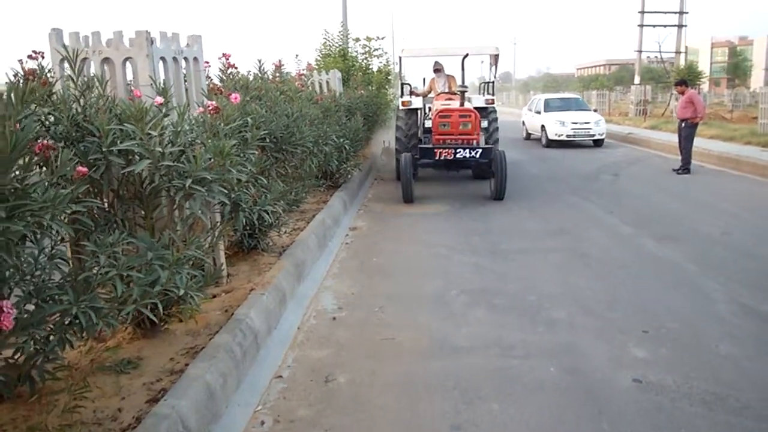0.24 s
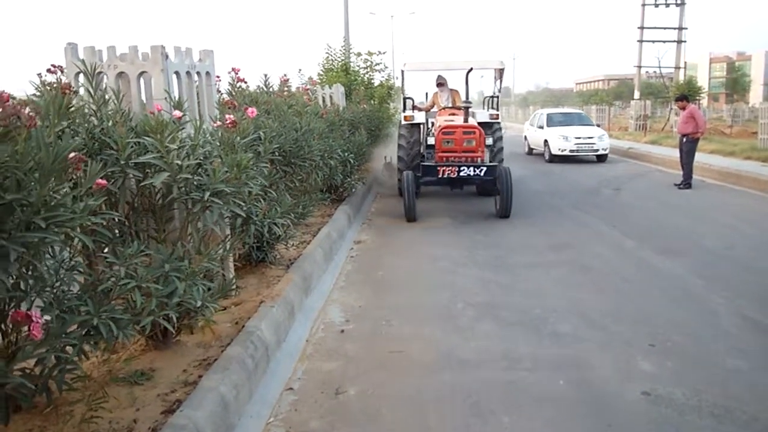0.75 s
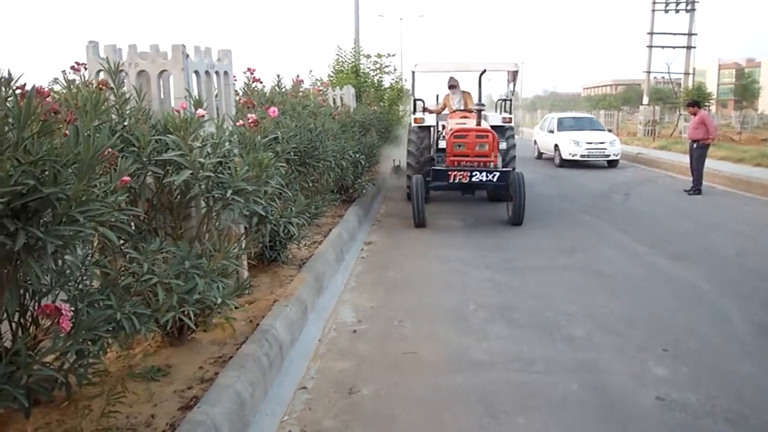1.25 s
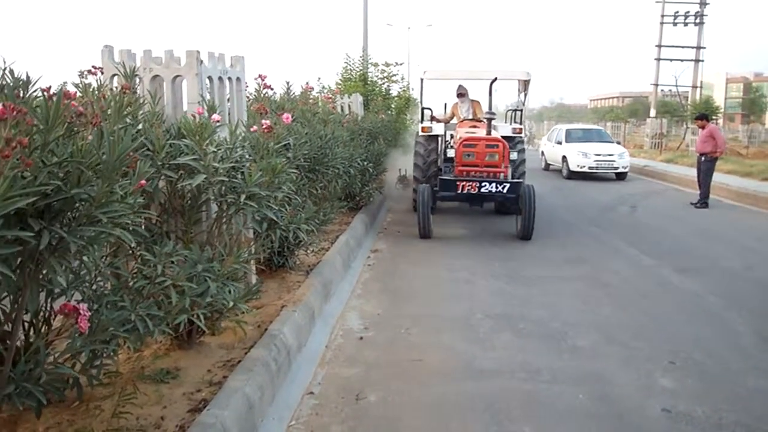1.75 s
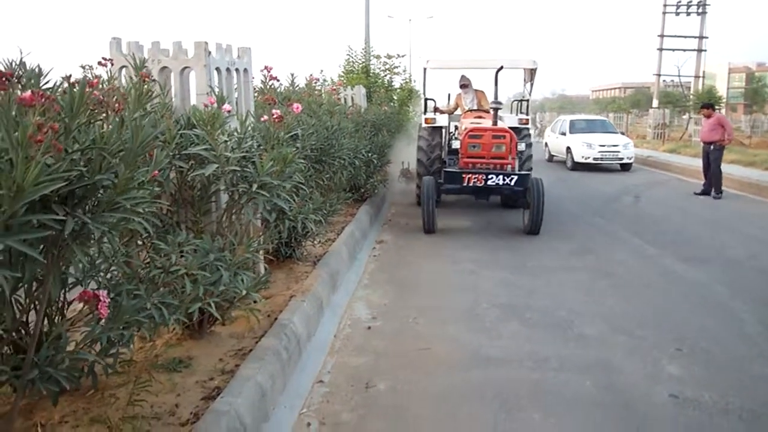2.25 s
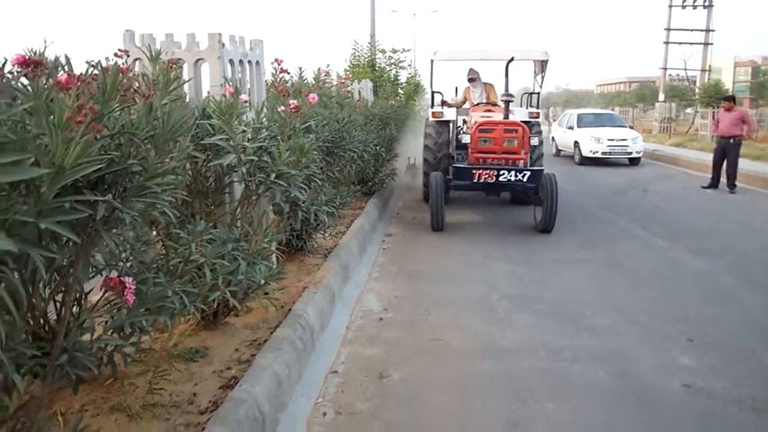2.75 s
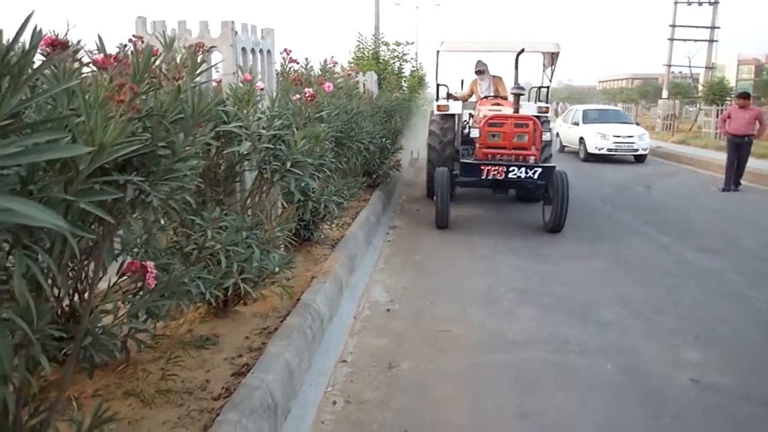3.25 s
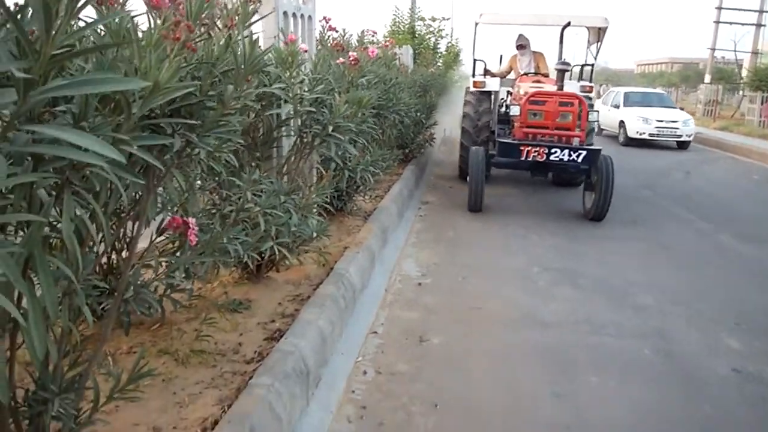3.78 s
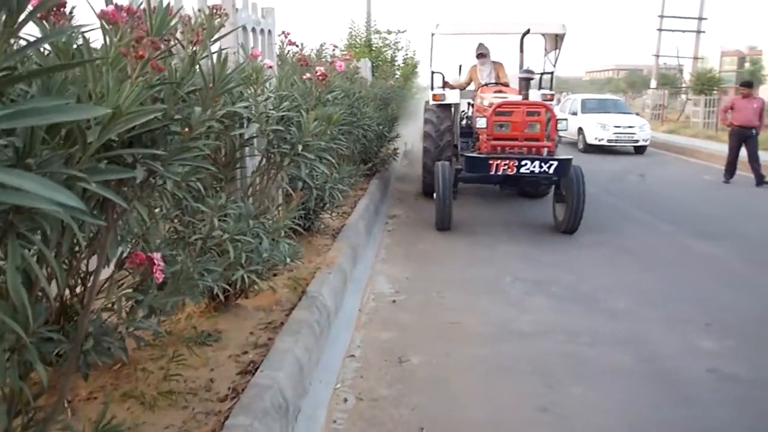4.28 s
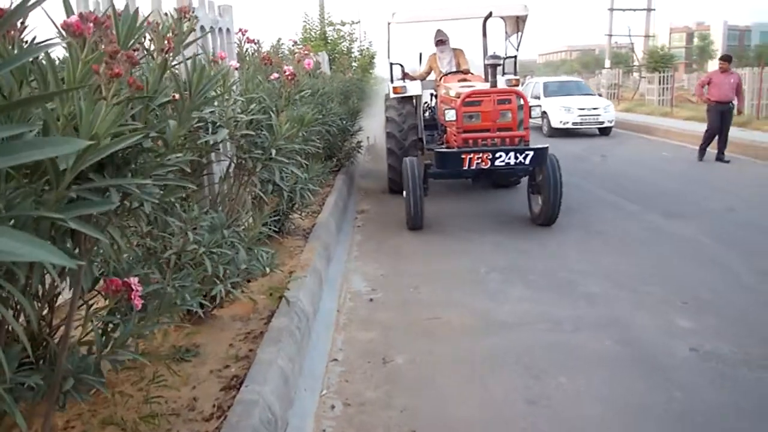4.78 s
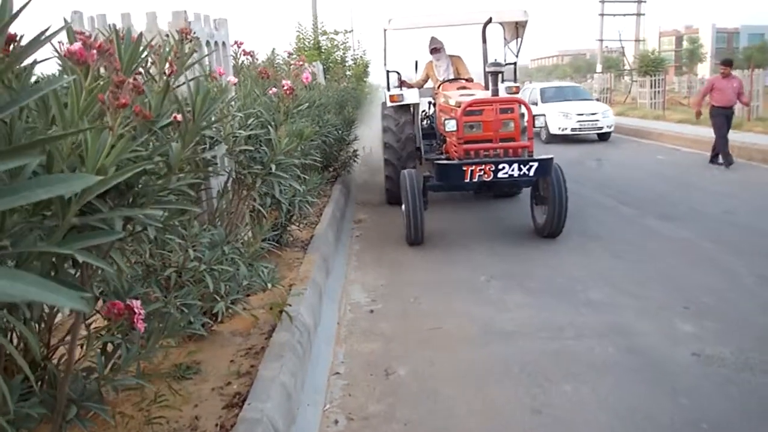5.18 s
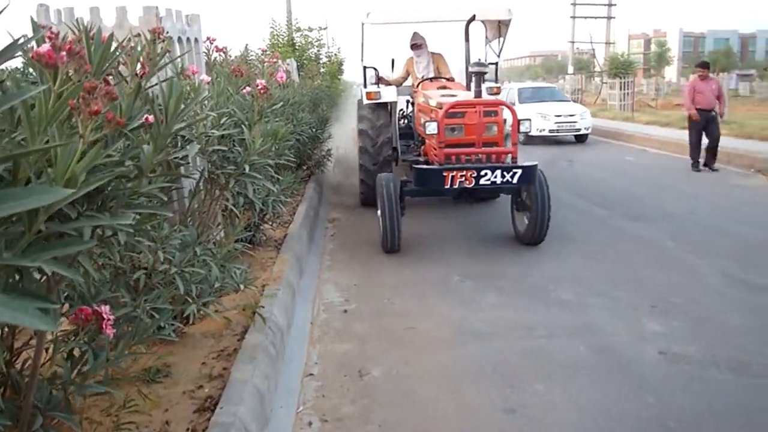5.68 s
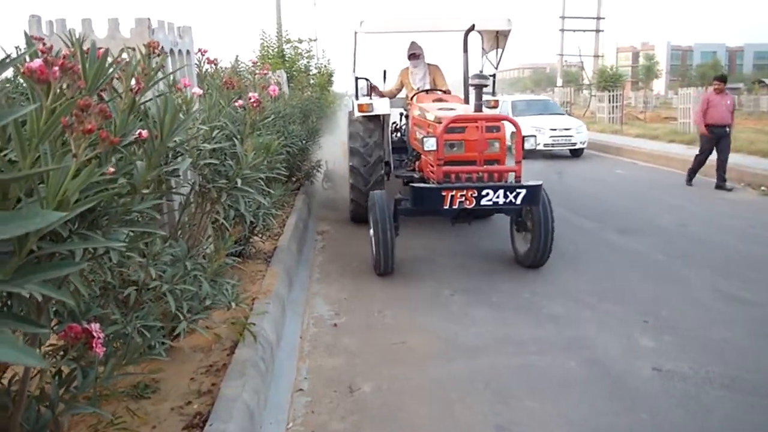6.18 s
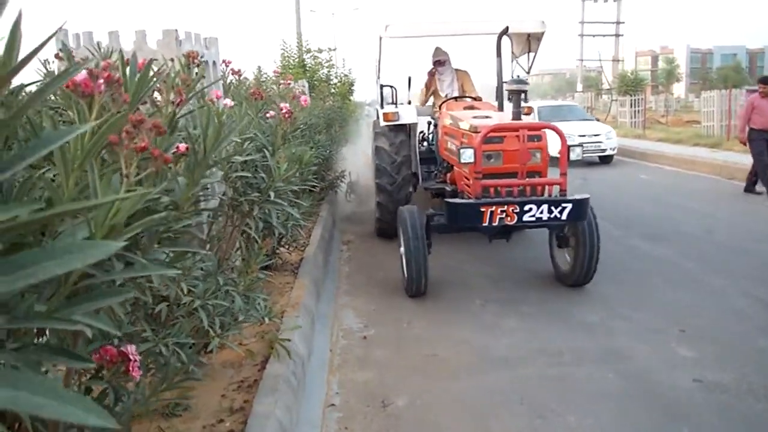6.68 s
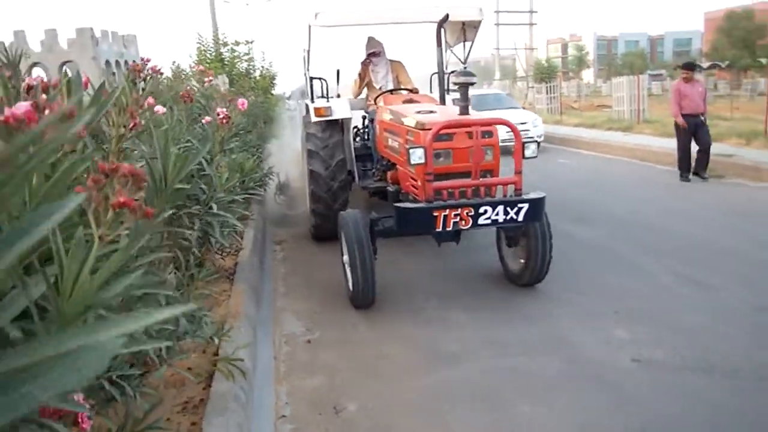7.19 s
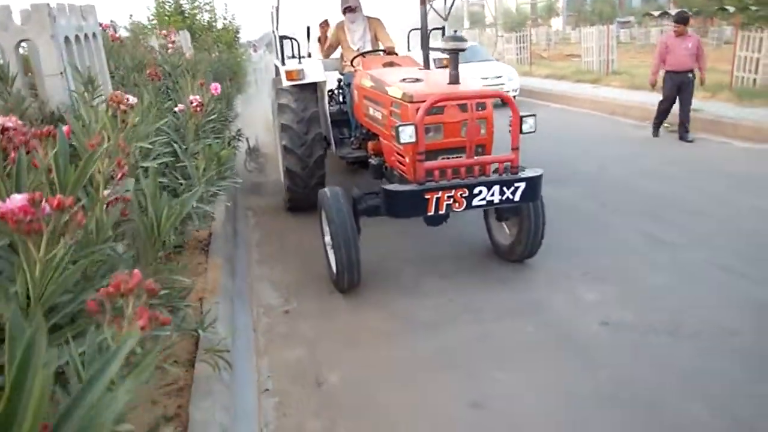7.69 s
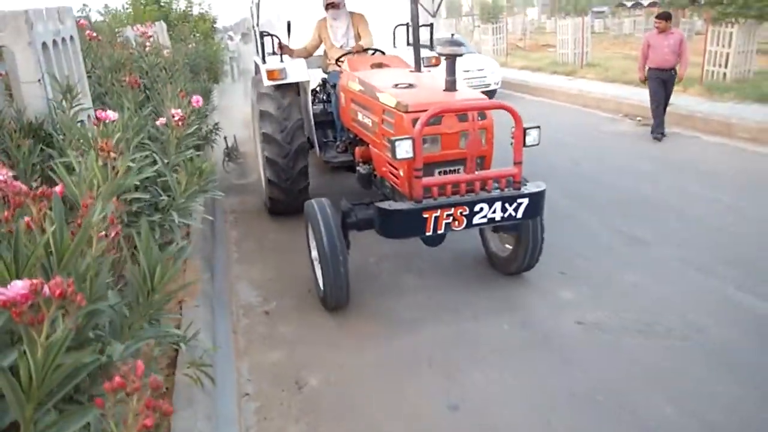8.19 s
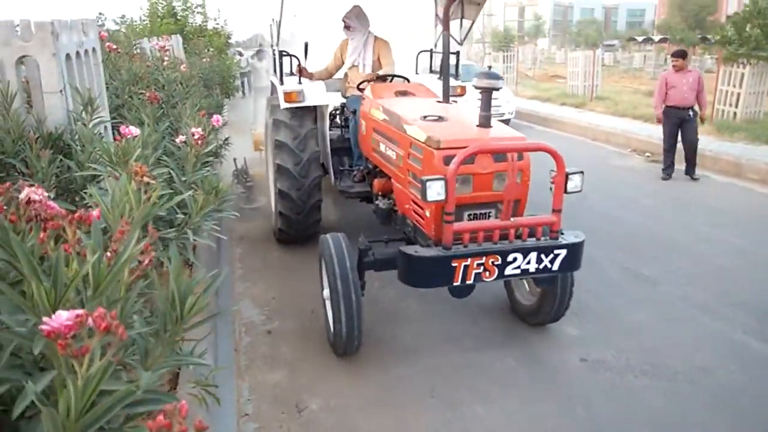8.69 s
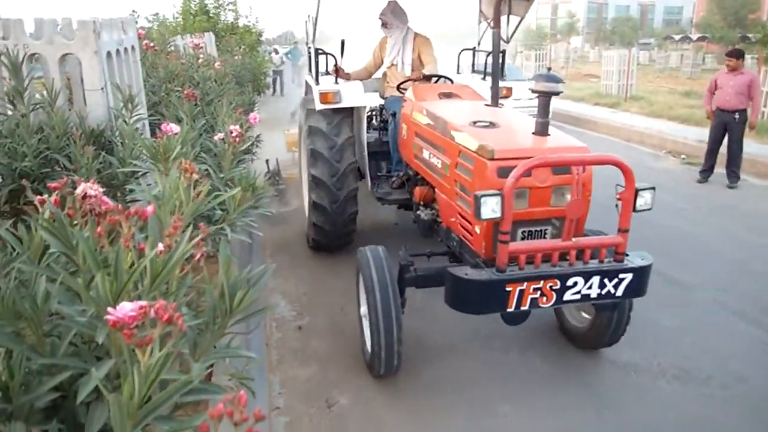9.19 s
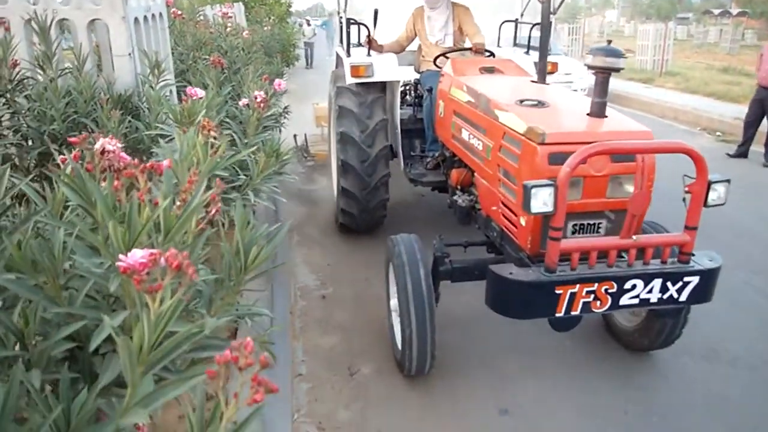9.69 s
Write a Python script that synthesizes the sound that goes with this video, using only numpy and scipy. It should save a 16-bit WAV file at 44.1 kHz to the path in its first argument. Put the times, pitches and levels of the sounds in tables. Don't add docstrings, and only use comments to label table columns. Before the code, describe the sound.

A three-cylinder diesel tractor thumps and clatters slowly closer along a road, its rotary broom scratching the concrete kerb harshly on the right at the end.

```python
import sys
import numpy as np
from scipy import signal
from scipy.fft import rfft, irfft
from scipy.io import wavfile
from scipy.ndimage import uniform_filter1d

SR = 44100
rng = np.random.default_rng(int(sys.argv[2]) if len(sys.argv) > 2 else 0)


def linear_from_db(decibels):
    return 10 ** (np.asarray(decibels, float) / 20)


def dump(signal):
    limited = np.clip(np.atleast_2d(signal).T, -1, 1)
    pcm = np.round(limited * 32767).astype(np.int16)
    wavfile.write(sys.argv[1], SR, pcm)


N = 438354
T = np.arange(N) / SR

# t/s, distance/m
DISTANCE = [
    (0, 12),
    (1.5, 12),
    (3.8, 10),
    (6.5, 4.16),
    (8.1, 3.2),
    (8.8, 2.26),
    (9.3, 2.14),
    (9.94, 1.63),
]
# t/s, speed/(cycles per s)
SPEED = [(0.0, 12.951), (0.65, 13.125), (2.05, 12.862), (3.58, 13.124), (4.62, 13.215), (5.63, 12.792),
         (6.0, 12.819), (6.77, 13.178), (7.29, 13.222), (8.45, 13.093), (9.25, 12.509), (9.94, 12.83)]
# t/s, extra level/dB
LOAD = [(0, -6), (1.3, -5.5), (3, -1.5), (4.8, 4.5), (6.2, 4), (7, 3.5), (8.4, -1.5), (9.94, -10.5)]
# count per cycle, far level/dB, near level/dB
EXHAUST = [
    (6, -10.5, -20.5),
    (9, -13, -26.5),
    (12, -15, -29),
]
# t/s, level/dB, tilt/dB per higher overtone
HOLLOW = [(0, -1, 2.5), (1.2, 0, 0.5), (1.8, -1, 0.5), (2.6, 4, -4.5), (3.4, 0.5, 4.5), (4.5, 0, 1.5),
          (5.4, 4, 4), (6, 3, 0), (6.8, 2, 2.5), (7.25, -3.5, -2), (7.6, -10, -9), (8.1, -4, -3),
          (8.6, -12, 3), (9.4, 0, -6), (9.94, 0, -5)]
# far level/dB, gain/dB per halved distance, share of effort
PUMP_LINES = [
    (-11.5, -2.5, 0.1),
    (-13, -0.5, 0.96),
    (-12.5, -2.5, 0.086),
]
# t/s, double/dB, fourth/dB, swell of the fourth/dB
PUMP_PRESSURE = [(0, 4.5, -1.5, 8.5), (1.3, 0, 1.5, 8.5), (2.2, 0, -4, 9), (2.8, 1.5, -0.5, 7.5),
                 (4.2, -5.5, -15, 20.5), (5.3, -1.5, 10, 4.5), (6.3, 2, 6.5, 4), (6.7, 1.5, -7.5, 9),
                 (7.2, 3, 0.5, -3), (7.8, -7, -5, 5.5), (8.8, -7, 3, 2), (9.94, -6, -1, 9)]
# far f/Hz, near f/Hz, width/Hz, then level/dB at each stage of the approach
BLOCK_MODES = [(138, 78, 83, -4, -18, -23, -14), (242, 217, 57, 1.5, -19, 1, 7.5),
               (311.6, 280, 27, 2, 0, 8, 4.5), (336.7, 316.5, 47, -12, 4.5, 6, 9),
               (436, 391, 51, -15.5, -6, 6, 7), (480, 507, 87, -16, -0.5, -13, -13),
               (631.7, 582, 22, -14, -4.5, 1.5, -3), (692, 726, 34, -14, -4.5, 0.5, 3.5),
               (804.7, 870, 18, 3, -3, -11, 1), (1005, 890, 30, -17, -19, -10, 1.5),
               (1200, 1186, 39, -29, -3.5, -2, 5.5)]
# first place in cycle/0-1, second level/dB, third level/dB
KNOCKS = [(.76, -1, -6), (.13, -8, -4), (.10, -10, -5), (.81, -5, -10), (.81, -6, -10), (.65, -3, -7),
          (.75, -1, -4), (.75, 0, -4), (.69, -2, -3), (.70, -2, -2), (.66, -1, 1)]
# place in cycle/0-1, level/dB
VALVES = [(.13, -23), (0.301, 7.5), (0.416, -5.5), (0.627, 12), (0.689, 11.5), (0.882, 1), (0.98, 17)]
# f/Hz, level/dB per Hz
RUMBLE = [(12, -33), (20, -24), (49, 12), (92, 6), (192, 9), (255, 8.5), (367, -21), (500, -18), (650, -54),
          (1100, -120)]
# t/s, lag/ms, level/dB
GROUND = [(0, 2.3, -42), (5, 3.8, -8), (7.6, 3.7, -3), (9.94, 3.3, -11)]
# f/Hz, level/dB per Hz
ROAR = [(350, -2.5), (480, -3.5), (700, -1.5), (900, -5.5), (1350, -4.5), (1750, -17.5), (2300, -55),
        (4000, -90)]
# f/Hz, level/dB per Hz
CLATTER = [(940, -41), (1600, -6.5), (2170, -1), (2550, -8), (2860, -7.5), (3660, -17), (5100, -13.5),
           (5940, -13), (6410, -19), (8360, -21.5), (12100, -35.5), (12700, -35.5), (14000, -39),
           (15600, -44)]
# t/s, level/dB against the thump
BROOM = [(0, -22.5), (1.8, -28.5), (2.6, -52), (3.4, -50), (4.2, -47), (5.3, -35), (5.85, -21), (6.7, -27),
         (7.45, -24.5), (7.9, -12.5), (8.8, -5.5), (9.94, -6)]
# f/Hz, level/dB per Hz
BRISTLES = [(530, -43), (900, -10), (1050, -40), (1200, -29), (1610, -10), (2420, -11), (2830, -8),
            (3900, -11), (7700, -32.5), (9100, -33), (13800, -60), (15600, -55)]
# f/Hz, width/Hz, level/dB
HOOD_MODES = [(1189, 24, -6.5), (2034, 130, -13), (2610, 190, -7.5), (3440, 1400, -14.5)]
# t/s, level of the top/dB against its body
BRIGHT = [(0, -9), (5.5, -1), (7.8, -10), (8.4, -7.5), (8.9, -2.5), (9.2, 2), (9.5, 2), (9.94, 4.5)]
# t/s, f/Hz, level/dB against the broom
RIDGE = [(0, 2000, -20), (5.5, 2004, 6.5), (7.8, 2025, -3), (8.2, 2286, -16), (8.55, 2910, -12),
         (8.9, 3394, -13), (9.1, 3880, -8.5), (9.3, 4280, -8), (9.55, 3960, -5.5), (9.94, 3810, -6)]
# f/Hz, level/dB
SHADE = [(1000, 2), (1900, 1), (2400, -2), (3000, -5), (3800, -10), (4800, -4), (6000, 2), (7500, -3),
         (9500, 0), (12000, -3)]
# t/s, f/Hz, level/dB
SQUEAL = [(2.0, 2150, -80), (2.6, 2100, -49), (3.5, 2123, -47), (3.75, 2140, -51), (4.0, 2125, -54),
          (4.2, 2090, -47), (4.5, 2100, -43), (4.6, 2120, -42), (4.84, 2115, -43), (4.92, 2094, -47),
          (5.02, 2080, -51), (5.12, 2080, -75)]
# f/Hz, left minus right/dB far, near, likeness/0-1, left lead/rad far, near
PORTS = [(60, 1.6, 1.5, .99, -.05, -.05), (200, 2, .5, .98, .2, .2), (380, 3, 1.5, .98, .32, .25),
         (800, 9.5, 2, .95, .6, -.2), (1100, 11.5, 3.5, .89, 0, -.9), (1450, 10.5, 1, .88, -.6, -1.8),
         (1900, 7, 0, .78, -.4, -1), (2400, 9, 5, .56, -1.1, -1), (3000, 8, 5, .57, -.8, -.8),
         (3800, 2, 1, .25, -.7, -.7), (4800, 8, 4, .48, -.1, .1), (6000, 12, 8, .25, -2.7, -1.5),
         (7500, 4, 2, .16, -4.2, -3.7), (9500, 15, 14, .13, -5.2, -5.3), (12000, 9, 9, .05, -7, -7),
         (14500, 4, 5, .05, -7, -7)]
# t/s, gain/dB held until the next step
GAIN_STEPS = [(0.0, 0.5), (0.489, 1.5), (0.988, -1.5), (1.766, -1), (1.976, 0.5), (2.472, -1.7),
              (2.749, -1.6), (3.133, 0), (3.981, -2), (4.121, -1), (4.649, 0), (5.047, -3.5), (5.245, -2.5),
              (5.637, -1), (6.519, -3.5), (7.034, -2), (7.413, -1.25), (8.171, 0.5), (8.99, 0.5),
              (9.354, -2)]
# start/s, length/s
OVERSHOOTS = [(1.77, 0.074), (2.752, 0.16), (4.175, 0.033), (4.656, 0.019), (5.237, 0.038), (5.626, 0.043),
              (5.93, 0.047), (6.712, 0.13), (7.008, 0.11), (7.469, 0.043), (7.705, 0.035)]
# t/s, level/dB
CLICKS = [(0.510, -33), (0.988, -32), (1.826, -29), (2.889, -33), (3.981, -27), (4.208, -31), (4.679, -33),
          (5.045, -28), (5.276, -29), (5.673, -33), (5.976, -26), (6.518, -27), (6.842, -33), (7.126, -26),
          (7.504, -27), (7.731, -24), (9.355, -25), (9.939, -18)]

THUMP_DB, LUMP, CRANK_START = -21.3, .12, -.144
PUMP_TEETH = 14.5
FAR_M, PUMP_HEIGHT_M, PORT_HEIGHT_M, MIRROR_DB = 14.7, 0.61, 1.136, -4
KNOCK, CASING, TAPPETS = (-6.5, 2.04, 0.43), (-5, 1.61, -0.084), (-18.5, 1, 0.035)
STAGES_S, TURNING_S = (0, 6.2, 8.2, 9.94), 6.65
RISE_MS = 3.5
BRISTLE_SPLIT_HZ = 2900
OVERSHOOT_DB, CEILING, CLICK_HZ = 2.5, .9, 11500
CIRCUIT_HZ, CIRCUIT_DB = 13394, -80


def unit(x):
    return x / np.sqrt(np.mean(x ** 2))


def curves(table):
    s, *columns = np.transpose(table)
    return [np.interp(T, s, c) for c in columns]


def over_hz(table, column=1):
    table = np.array(table)
    hz = np.arange(N // 2 + 1) * SR / N
    return np.interp(np.log(hz + 1), np.log(table[:, 0]), table[:, column])


def colour(x, spectrum):
    return unit(irfft(rfft(x) * linear_from_db(over_hz(spectrum)), N))


def lowpass(x, hz, order=2):
    return signal.sosfilt(signal.butter(order, hz, fs=SR, output="sos"), x)


def highpass(x, hz, order):
    return signal.sosfilt(signal.butter(order, hz, "high", fs=SR, output="sos"), x)


def ring(x, hz, width_hz):
    pole = np.exp((2j * np.pi * hz - np.pi * width_hz) / SR)
    return signal.lfilter([1], [1, -pole], x).imag


def walk(rate):
    k = int(SR / rate)
    held = np.repeat(rng.standard_normal(N // k + 1), k)
    return 1.83 * uniform_filter1d(uniform_filter1d(held, k), k)[:N]


def strikes(cycle, pattern, scatter_db, jitter):
    place, db = np.transpose(pattern)
    turn = np.arange(int(cycle[-1]) + 1)[:, None] + place
    chance = rng.standard_normal(turn.shape + (2,))
    at = np.interp(turn + jitter * chance[..., 0], cycle, np.arange(N)).astype(int)
    strength = linear_from_db(db + scatter_db * chance[..., 1])
    return np.bincount(at.ravel(), strength.ravel(), N)


def gate(cycle, decay_s, steady):
    blows = strikes(cycle, VALVES, scatter_db=0.5, jitter=0.0073)
    return steady + unit(signal.lfilter([1], [1, -np.exp(-1 / (decay_s * SR))], blows))


def repeating(cycle, memory):
    size = 4096
    fresh = rng.standard_normal((int(cycle[-1]) + 2, size))
    keep = np.clip(memory, 0, .98)
    turns = signal.lfilter([np.sqrt(1 - keep ** 2)], [1, -keep], fresh, axis=0, zi=keep * fresh[-1:])[0]
    return turns.ravel()[(cycle * size).astype(int)]


def exhaust(cycle):
    angle = 2 * np.pi * (cycle + CRANK_START)
    out = np.cos(3 * angle) * (1 + LUMP * np.cos(angle - 4 * np.pi / 3))
    hollow_db, tilt_db = curves(HOLLOW)
    for count, far_db, near_db in EXHAUST:
        approach_db = far_db + (near_db - far_db) * T / T[-1]
        road_db = hollow_db + tilt_db * (count / 3 - 2.5)
        level = linear_from_db(approach_db + road_db + 0.5 * walk(4.03))
        out = out + level * np.cos(count * angle - 0.14 * (count - 3))
    return np.sqrt(2) * linear_from_db(.4 + .12 * T) * out


def pump(cycle, line_db, double_db, fourth_db):
    teeth = 2 * np.pi * PUMP_TEETH * cycle
    double_oil_db, fourth_oil_db, swell_db = curves(PUMP_PRESSURE)
    torque = np.cos(2 * np.pi * (cycle - .66)) + .4 * np.cos(8 * np.pi * (cycle - .545))
    throb = (1 + .5 * np.cos(6 * np.pi * (cycle - .16))) * (1 + .85 * np.cos(2 * np.pi * cycle))
    line = linear_from_db(line_db - .5 + .6 * walk(5)) * np.cos(teeth + .2 * walk(7))
    double_level = linear_from_db(double_db + double_oil_db - 1 + .8 * walk(8))
    double = double_level * throb * np.cos(2 * teeth + .3 * walk(5))
    fourth_level = linear_from_db(fourth_db + fourth_oil_db + swell_db * torque + .4 * walk(8))
    fourth = fourth_level * np.cos(4 * teeth + .2 * walk(6))
    return np.sqrt(2) * (line + double + fourth)


def mirrored(x, metres):
    lag_s = 2 * PUMP_HEIGHT_M * PORT_HEIGHT_M / metres / 343
    return x + linear_from_db(MIRROR_DB) * np.interp(T - lag_s, T, x)


def block(cycle):
    out = 0
    turned = np.clip((T - TURNING_S) / (T[-1] - TURNING_S), 0, 1)
    rise_pole = np.exp(-1e3 / (RISE_MS * SR))
    for mode_row, (first, second_db, third_db) in zip(BLOCK_MODES, KNOCKS):
        far_hz, near_hz, width_hz, *level_db = mode_row
        firings = [(first, 0), ((first + 1 / 3) % 1, second_db), ((first + 2 / 3) % 1, third_db)]
        blows = strikes(cycle, firings, scatter_db=1.2, jitter=.0015)
        spin = np.exp(2j * np.pi * np.cumsum(far_hz + (near_hz - far_hz) * turned) / SR)
        push = signal.lfilter([1], [1, -rise_pole], blows / spin)
        ringing = signal.lfilter([1], [1, -np.exp(-np.pi * width_hz / SR)], push)
        mode = highpass((spin * ringing).imag, .6 * near_hz, order=2)
        out = out - linear_from_db(np.interp(T, STAGES_S, level_db)) * unit(mode)
    return unit(lowpass(out, 1800))


def ground(x):
    lag_ms, echo_db = curves(GROUND)
    return x + linear_from_db(echo_db) * np.interp(T - lag_ms / 1e3, T, x)


def rumble(cycle):
    level = linear_from_db(-14 - .55 * T + curves(HOLLOW)[0] + 1.2 * walk(2))
    return level * ground(colour(repeating(cycle, memory=.7), RUMBLE))


def roar(cycle, valve_gate, level_db):
    return linear_from_db(level_db - 2.2) * colour(valve_gate * repeating(cycle, memory=.88), ROAR)


def clatter(cycle, valve_gate, level_db):
    rattle = repeating(cycle, memory=0.65) + rng.standard_normal(N)
    rattle = valve_gate * rattle + 1.73 * highpass(rattle, 5600, order=4)
    return linear_from_db(level_db - 1.5) * colour(rattle, CLATTER)


def broom(cycle, broom_db):
    rows = gate(cycle, decay_s=0.0056, steady=0.58)
    flicks = linear_from_db(0.21 * rng.exponential(size=N // 40 + 1).repeat(40)[:N])
    right, own = rng.standard_normal((2, N)) * flicks
    left = own + 1.4 * np.roll(right, 5)
    scratch = np.array([colour(g * (3 + rows), BRISTLES) for g in (left, right)])
    driven = scratch * (.8 + rows)
    scratch = scratch + sum(linear_from_db(db) * unit(ring(driven, hz, width_hz)) for hz, width_hz, db in HOOD_MODES)
    split = signal.butter(3, BRISTLE_SPLIT_HZ, fs=SR, output="sos")
    body = signal.sosfiltfilt(split, scratch)
    ridge_hz, ridge_db = curves(RIDGE)
    sway = lowpass(rng.standard_normal((2, N)), 380)
    turn = 2 * np.pi * np.cumsum(ridge_hz) / SR
    carried = sway[0] * np.cos(turn) + sway[1] * np.sin(turn)
    ridge = linear_from_db(ridge_db) * unit((4.1 + rows) * carried)
    both = body + linear_from_db(curves(BRIGHT)[0]) * (scratch - body)
    both = both + np.array([0.1 * np.roll(ridge, 5), ridge])
    both[0] += linear_from_db(12) * highpass(both[0], 6800, order=4)
    both[0] = irfft(rfft(both[0]) * linear_from_db(over_hz(SHADE)), N)
    both[1] = lowpass(both[1], 8500)
    return linear_from_db(broom_db) * both * linear_from_db(np.array([[-13], [-2.5]]))


def belt():
    squeal_hz, squeal_db = curves(SQUEAL)
    level = linear_from_db(squeal_db - THUMP_DB + .5 * walk(13))
    return level * np.cos(2 * np.pi * np.cumsum(squeal_hz + walk(20)) / SR)


def ports(shared, left=None, right=None):
    alike = 1 if left is None else np.clip(over_hz(PORTS, column=3), 0, 1)
    common = np.sqrt(alike) * rfft(shared)
    own = 0 if left is None else np.sqrt(1 - alike) * rfft([left, right])
    heard = []
    for tilt, lead in ((1, 4), (2, 5)):
        g = linear_from_db(over_hz(PORTS, column=tilt) / 2)
        turn = np.exp(.5j * over_hz(PORTS, column=lead))
        arriving = common * np.array([turn, 1 / turn]) + own
        heard.append(irfft(arriving * np.array([g, 1 / g]) * 2 / (g + 1 / g), N))
    close = np.clip((T - 4.5) / 4.1, 0, 1)
    return (1 - close) * heard[0] + close * heard[1]


def scene():
    (rate,), (metres,), (broom_db,), (load_db,) = (curves(t) for t in (SPEED, DISTANCE, BROOM, LOAD))
    halvings = np.log2(FAR_M / metres)
    *pump_db, knock_db, roar_db, clatter_db = (
        far_db + gain_db * halvings + share * load_db
        for far_db, gain_db, share in (*PUMP_LINES, KNOCK, CASING, TAPPETS))
    cycle = np.cumsum(rate) / SR
    tones = exhaust(cycle) + mirrored(pump(cycle, *pump_db), metres)
    tones = tones + linear_from_db(knock_db - 3.0) * block(cycle) + belt()
    tones = tones * np.clip(np.minimum(T, T[-1] - T) / .003, 0, 1)
    slow = gate(cycle, decay_s=0.0067, steady=3.2)
    quick = gate(cycle, decay_s=0.0091, steady=3.07)
    paths = [rumble(cycle) + roar(cycle, slow, roar_db) + clatter(cycle, quick, clatter_db) for _ in range(3)]
    return linear_from_db(THUMP_DB) * (ports(tones) + ports(*paths) + broom(cycle, broom_db + 4.5))


def gain_control():
    s, gain_db = np.transpose(GAIN_STEPS)
    at = (s * SR).astype(int)
    lift_db = OVERSHOOT_DB * sum((T >= start) & (T < start + length) for start, length in OVERSHOOTS)
    held = linear_from_db(gain_db[np.searchsorted(at, np.arange(N), side="right") - 1] + lift_db)
    gain = np.minimum(held, uniform_filter1d(held, 600, origin=299))
    return uniform_filter1d(gain, size=9)


def clicks():
    click_s, click_db = np.transpose(CLICKS)
    peaks = np.bincount((click_s * SR).astype(int), linear_from_db(click_db), N)
    treble = signal.butter(1, CLICK_HZ, "high", fs=SR, output="sos")
    return signal.sosfiltfilt(treble, linear_from_db(4.5) * peaks)


def roll_off(x):
    return signal.sosfilt(signal.butter(12, 15720, fs=SR, output="sos"), x)


def record(dry):
    driven = highpass(dry, 8, order=1) * gain_control()
    limited = driven / (1 + (driven / CEILING) ** 4) ** .25
    whistle = linear_from_db(CIRCUIT_DB) * np.cos(2 * np.pi * CIRCUIT_HZ * T)
    return roll_off(limited + clicks() + whistle)


dry = scene()
out = record(dry)
dump(out)
```